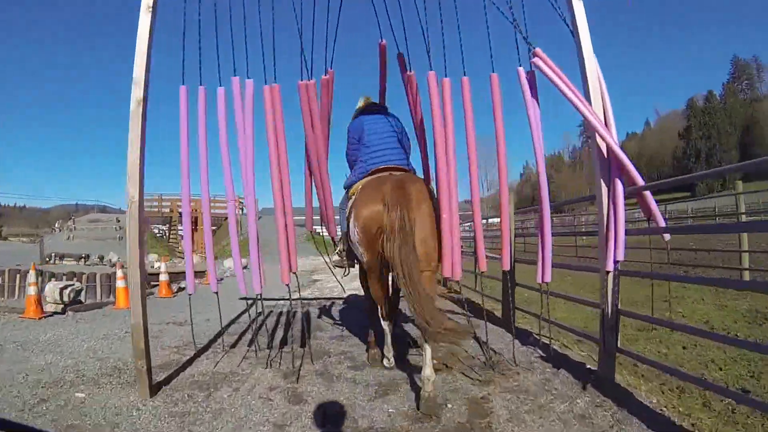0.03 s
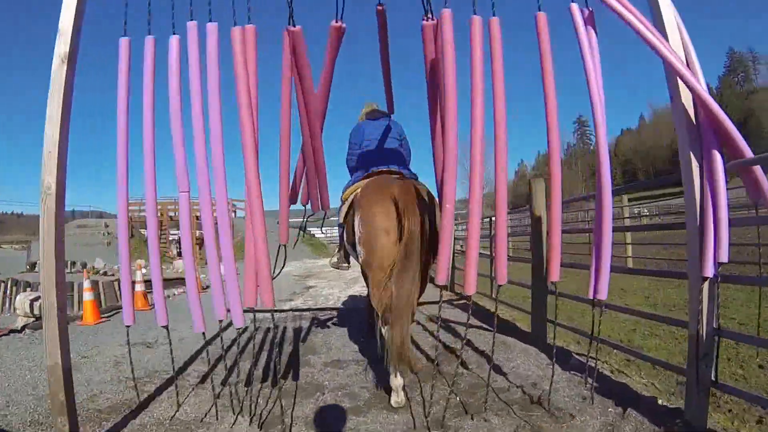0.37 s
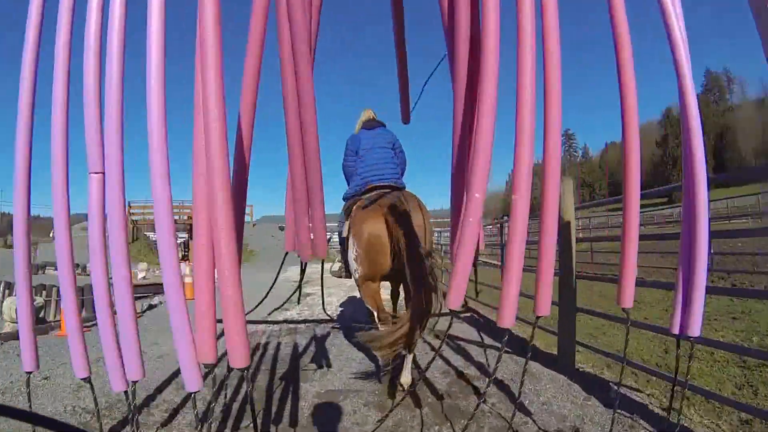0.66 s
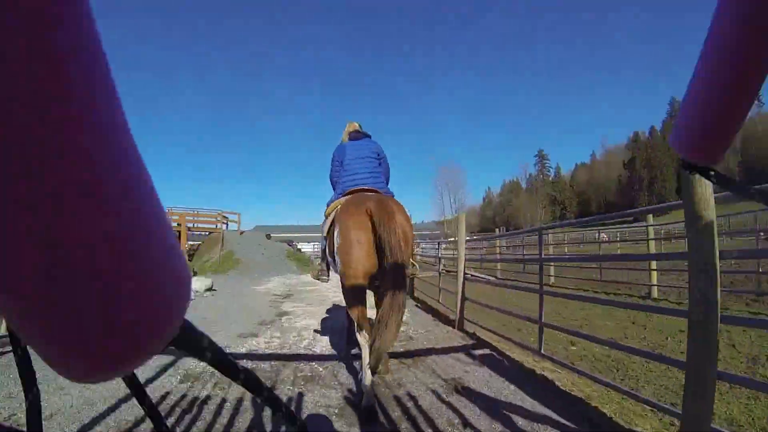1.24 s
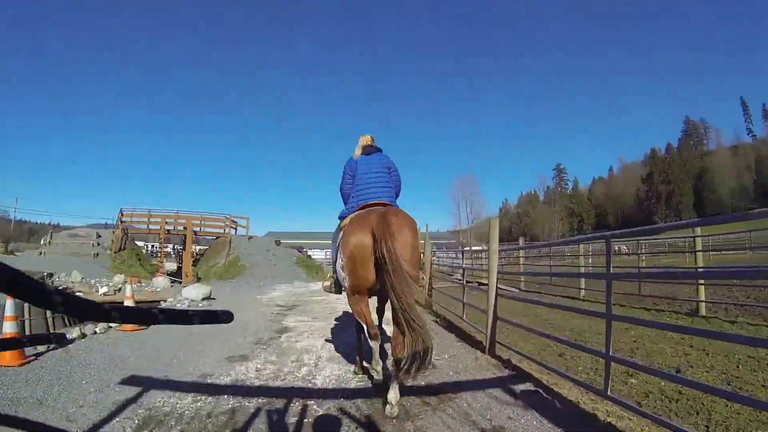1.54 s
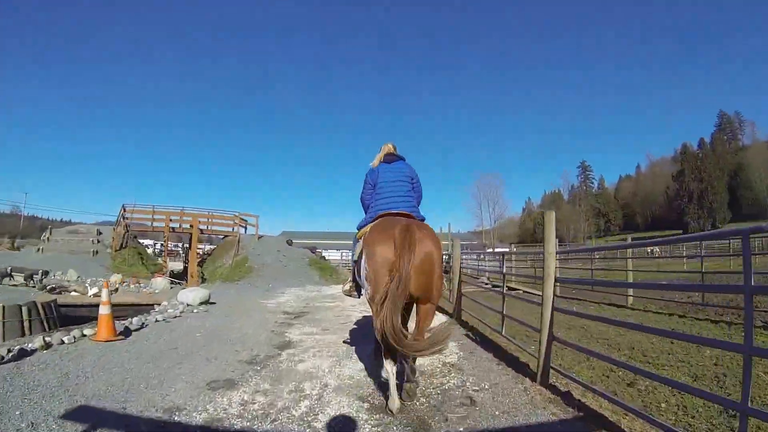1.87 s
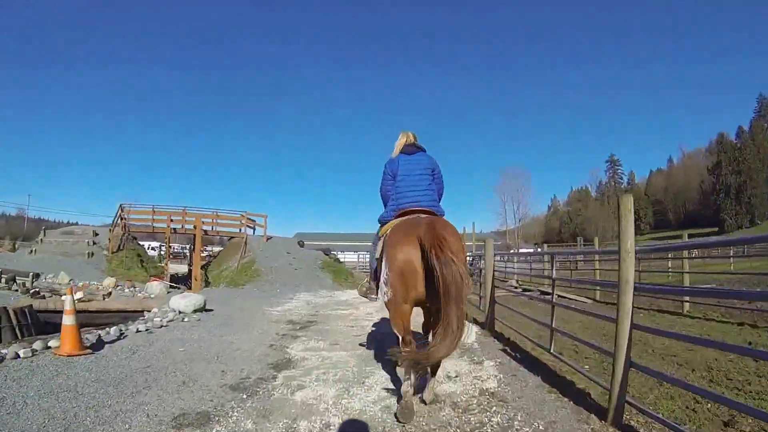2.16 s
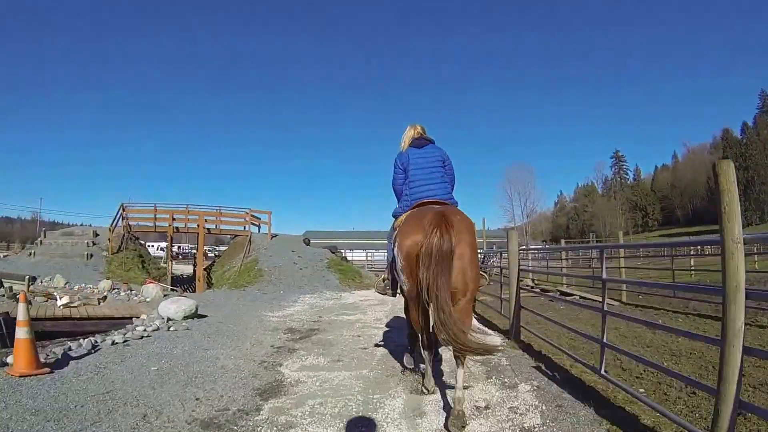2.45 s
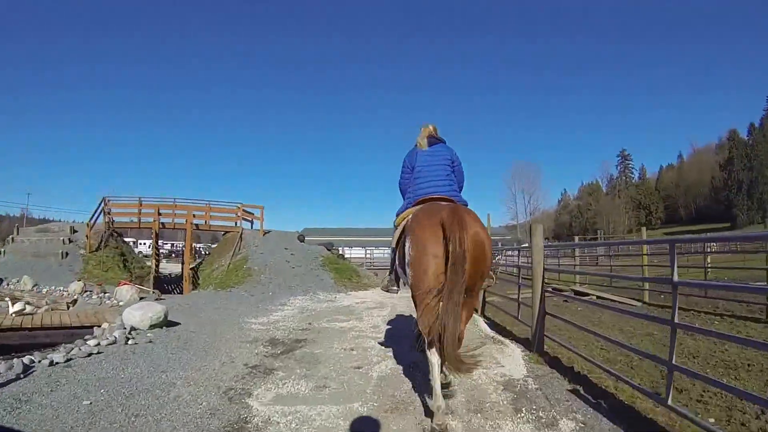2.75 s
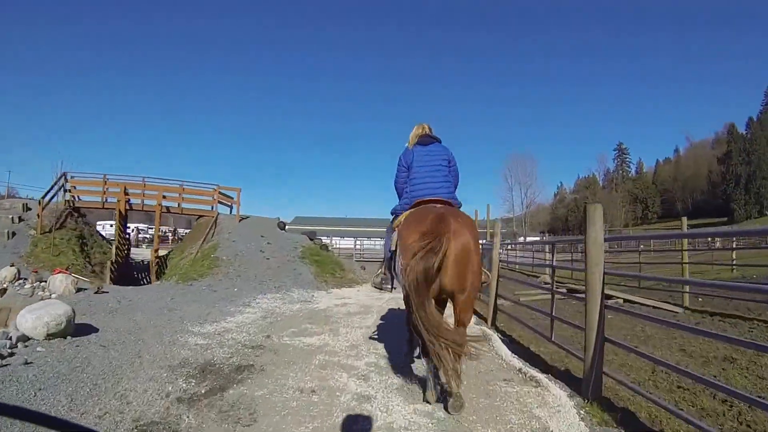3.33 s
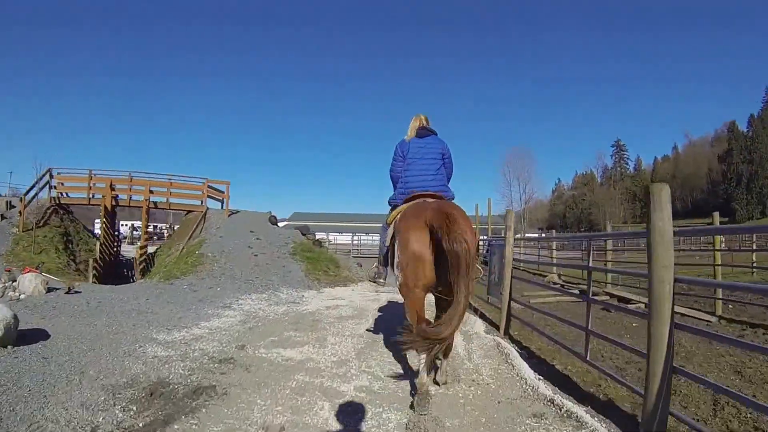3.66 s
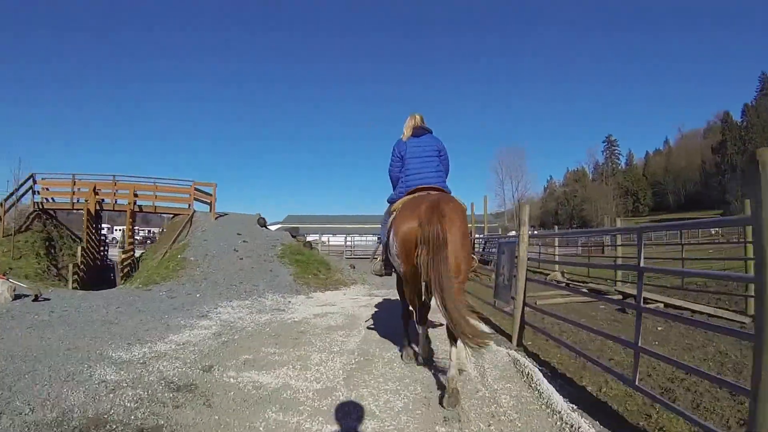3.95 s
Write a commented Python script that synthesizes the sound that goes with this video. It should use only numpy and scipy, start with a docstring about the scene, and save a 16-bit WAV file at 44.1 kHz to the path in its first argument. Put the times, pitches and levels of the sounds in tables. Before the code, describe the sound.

Low, jolting rumble of a camera riding over gravel behind a walking horse, with crunches and clacks.

```python
"""A cased camera's mount sways and drones as it rides over rough gravel just behind a walking horse.
Jolts thump through it with a gritty crackle; heavier bumps leave it ringing. Stones grind under the
carrier and steps crunch. Hard parts clack against the carrier and ring the case as it passes hanging
foam poles and ropes, then a bumpy stretch. Wind and road rumble below; faint squeaks and a whine above."""
import sys
import numpy as np
from scipy.fft import rfft, irfft, next_fast_len
from scipy.io import wavfile
from scipy.ndimage import uniform_filter1d, minimum_filter1d, map_coordinates

SR = 44100
rng = np.random.default_rng(int(sys.argv[2]) if len(sys.argv) > 2 else 0)


def put_to_file(sound):
    """Save the sound as 16-bit audio at rate SR, in the file named by the first command-line argument."""
    columns = np.atleast_2d(sound).T  # one column per channel
    safe = np.clip(columns, -1, 1)
    whole_steps = np.round(safe * 32767)
    wavfile.write(sys.argv[1], SR, whole_steps.astype(np.int16))


N = 176400

# mount jolts: time_s, level_db, pitch_hz, crackle_db
MOUNT_JOLTS = [(0.076, -4.5, 48.5, -49), (0.119, -9.5, 68.7, -49), (0.375, -9, 54.2, -53.5),
               (0.515, -13.5, 137, -61), (0.594, -4.5, 86, -69), (0.661, -10, 58, -51),
               (0.888, -3.5, 56.4, -49.5), (1.082, -4, 80.4, -49.5), (1.311, -5.5, 61.5, -49),
               (1.349, -33, 44.3, -57.5), (1.516, -10.5, 58.3, -54), (1.535, -9.5, 49.4, -49),
               (1.633, -5.5, 80.6, -49.5), (1.856, -9, 51, -50), (1.923, -11.5, 113.3, -50.5),
               (2.079, -9, 59, -53), (2.244, -11.5, 51.4, -65.5), (2.345, -12, 89.4, -63),
               (2.436, -12.5, 88, -50), (2.497, -12.5, 79.5, -66), (2.567, -10.5, 66, -65),
               (2.701, -17, 71.4, -86), (3.18, -12.5, 70.5, -65.5), (3.261, -6.5, 48.4, -47.5),
               (3.347, -17, 120.5, -52), (3.633, -12, 78, -85), (3.695, -6, 84, -56),
               (3.774, -7.5, 87, -54.5), (3.828, -7, 58.6, -50.5), (3.871, -6, 45.8, -52.5)]
# gravel spectrum: freq_hz, density_db
GRAVEL_SPECTRUM = [(120, -28), (320, 10.5), (400, -2), (480, -2.5), (555, 14.5), (620, -1), (690, -3.5),
                   (770, 1.5), (880, -7), (1150, 0.5), (1600, -2), (1950, -13), (2600, -20), (3650, -21.5),
                   (4150, -38), (7000, -52), (11000, -66), (15000, -65.5)]
# crackle spectrum: freq_hz, density_db
CRACKLE_SPECTRUM = [(500, 0.5), (2000, 15.5), (4000, 7), (6500, -0.5), (9000, -8), (11500, -10),
                    (13000, -19.5), (15000, -40.5)]
CRACKLE_GAIN_DB = 7.5


def amp(db):
    """Decibels to gain."""
    return 10 ** (np.asarray(db) / 20)


def unit(x):
    """Scale to rms 1."""
    return x / np.sqrt(np.mean(x ** 2) + 1e-20)


def unit_blow(x):
    """Scale to the energy of 5 ms at rms 1."""
    return x / np.sqrt(np.sum(x ** 2) / (.005 * SR))


def curve(rows):
    """Per-sample values from (time_s, value) rows."""
    return np.interp(np.arange(N) / SR, *np.transpose(rows))


def wobble(rate_hz):
    """Smooth random curve, rate_hz knots a second."""
    return map_coordinates(rng.standard_normal(4096), [np.arange(N) * rate_hz / SR], mode="wrap")


def arch(start_s, length_s):
    """Rounded envelope, peak 1."""
    progress = np.clip((np.arange(N) / SR - start_s) / length_s, 0, 1)
    return np.sqrt(np.abs(np.sin(np.pi * progress)))


def tone(hz):
    """Sine of per-sample pitch, rms 1."""
    return unit(np.sin(2 * np.pi * np.cumsum(hz) / SR))


def filtered(x, response):
    """Apply a frequency response."""
    size = next_fast_len(len(x) + SR // 10)
    return irfft(rfft(x, size) * response(np.fft.rfftfreq(size, 1 / SR)), size)[:len(x)]


def coloured(x, spectrum):
    """Filter by (freq_hz, density_db) rows on a log axis; rms 1."""
    freq_hz, density_db = np.transpose(spectrum)
    return unit(filtered(x, lambda hz: amp(np.interp(np.log(hz + 1), np.log(freq_hz + 1), density_db))))


def grit(spectrum, spiky=0.6, size=N):
    """Tiny contacts of log-normal strength, 32 samples each; coloured, rms 1."""
    log_strength = spiky * np.clip(rng.standard_normal(size // 32 + 1), -1.8, 1.8)
    strength = np.repeat(np.exp(log_strength), 32)[:size]
    return coloured(rng.standard_normal(size) * strength, spectrum)


def sway():
    """The mount shakes at its lowest, wandering frequency; hard jolts interrupt the swing."""
    # time_s, level_db
    levels = [(0.0, -1.5), (0.07, -17.5), (0.14, -10.5), (0.17, -33), (0.22, -14), (0.99, -14.5),
              (1.05, -31), (1.1, -20), (1.14, -24), (1.38, -12.5), (1.49, -26.5), (1.53, -12), (1.73, -17),
              (1.79, -30.5), (1.85, -7.5), (1.88, -12.5), (1.92, -31), (2.1, -12.5), (2.16, -10),
              (2.21, -24), (2.25, -7), (2.32, -25.5), (2.44, -9.5), (2.75, -16.5), (3.19, -11.5),
              (3.22, -28), (3.25, -13.5), (3.5, -17.5), (3.9, -11), (4.0, -12.5)]
    stall_s, full_stall_db = 0.013, 12.5
    t = np.arange(N) / SR
    swing = amp(curve(levels) + 0.5) * tone(hz=37.65 + 4.59 * wobble(15))
    for time_s, level_db, pitch_hz, _ in MOUNT_JOLTS:
        depth = min(amp(level_db - full_stall_db), 1)
        swing *= 1 - depth * np.exp(-((t - time_s - .25 / pitch_hz) / stall_s) ** 2)
    return swing


def rumble():
    """Wind and road: uneven low noise."""
    # freq_hz, density_db
    spectrum = [(10, 4), (24, 9.5), (45, 12.5), (65, 1.5), (110, -7), (180, -34.5), (260, -53.5),
                (400, -71.5)]
    return amp(-24) * grit(spectrum, spiky=0.7)


def fizz(shaking):
    """Tiny ticks and faint hiss, strongest at the turning points of the shaking."""
    # freq_hz, density_db
    hiss_spectrum = [(1000, 1.5), (5000, 8.5), (8000, -1.5), (11000, -10.5), (12500, -20), (15500, -29)]
    ticks_per_s = 890
    strain = np.minimum(unit(shaking) ** 2, 3)
    ticks = (rng.random(N) < ticks_per_s / SR) * (2 * rng.random(N) - 1)
    crackle = coloured(ticks * (.1 + strain), CRACKLE_SPECTRUM)
    hiss = (1 + 0.6 * strain) * grit(hiss_spectrum, spiky=0)
    return amp(-64) * crackle + amp(-87.5) * hiss


def drone():
    """Rough ground keeps the mount's resonances ringing."""
    # time_s, level_db
    levels = [(0.0, -29.5), (0.39, -33.5), (0.99, -28.5), (1.32, -33.5), (1.56, -34.5), (1.86, -33.5),
              (2.28, -30), (2.51, -28), (2.65, -23), (2.91, -32.5), (3.07, -26.5), (3.24, -29),
              (3.48, -30.5), (3.6, -29.5), (4.0, -32.5)]
    # mount resonances: centre_hz, width_hz, level_db
    modes = [(187, 23.6, 7.5), (148, 88.6, -4), (305, 57, -14.5), (87.5, 32.4, -9)]
    gain_db, flutter_db, lowpass_hz = 4, 6, 600

    def response(hz):
        body = 0
        for k, (centre_hz, width_hz, level_db) in enumerate(modes):
            damping = 1j * hz * width_hz
            body += (-1) ** k * amp(level_db) * damping / (centre_hz ** 2 - hz ** 2 + damping)
        return body / (1 + (hz / lowpass_hz) ** 4)

    ring = filtered(rng.standard_normal(N), response)
    running_rms = np.sqrt(np.abs(uniform_filter1d(ring ** 2, size=2000)) + 1e-12)
    return amp(curve(levels) + gain_db + flutter_db * np.tanh(wobble(25))) * ring / running_rms


def rolling():
    """Small stones grind under the carrier, brighter on loose ground."""
    # time_s, level_db, treble_db
    ground = [(0.0, -35.5, -4.5), (0.12, -41.5, -1), (0.3, -39, 2.5), (0.39, -45.5, -7), (0.42, -46, -9.5),
              (0.49, -40.5, -2.5), (0.54, -40.5, 2), (0.7, -46, 0), (0.8, -45, -2.5), (1.16, -42.5, 4),
              (1.3, -47, -10), (1.44, -53.5, 7), (1.58, -52.5, 0), (1.74, -48, 1.5), (1.96, -41, 0),
              (2.1, -43, -6), (2.19, -44, -3), (2.3, -41.5, 4.5), (2.46, -38, -4.5), (2.54, -38, 5),
              (2.63, -46.5, 6), (2.87, -43.5, -2), (3.06, -43.5, -3), (3.28, -35.5, -8.5),
              (3.45, -46, -4.5), (3.68, -38, -2.5), (3.82, -40.5, -10), (4.0, -47.5, -15)]
    gain_db, flutter_db, shelf_hz = 1.5, 3.5, 1870
    level_db, treble_db = (curve(np.array(ground)[:, [0, k]]) for k in (1, 2))
    stones = grit(GRAVEL_SPECTRUM, spiky=0.43)
    treble = filtered(stones, lambda hz: 1 - 1 / (1 + (hz / shelf_hz) ** 8))
    envelope = amp(level_db + gain_db + flutter_db * np.tanh(wobble(45)))
    return envelope * (stones + (amp(treble_db) - 1) * treble)


def whine():
    """Very quiet, wavering high tone."""
    # time_s, level_db
    levels = [(0, -77), (0.12, -84), (.35, -80.5), (0.45, -83), (.6, -83), (0.9, -86), (1.5, -89.5),
              (1.74, -91), (1.83, -78), (2.0, -90), (2.3, -92.5), (2.4, -78), (2.9, -89), (3.21, -80),
              (3.25, -105)]
    return amp(curve(levels) + wobble(8)) * tone(hz=10645 + 22 * wobble(120))


def booms():
    """Heavier bumps leave the mount ringing briefly."""
    # start_s, level_db, pitch_hz, t60_s
    bumps = [(0.018, -10.5, 185, 0.31), (0.107, -12, 207, 0.099), (0.343, -4, 175.5, 0.18),
             (0.504, -11.5, 179, 0.079), (0.846, -8.5, 179.5, 0.072), (1.041, -14, 218, 0.077),
             (1.076, -9.5, 161.4, 0.13), (1.464, -20.5, 188, 0.39), (1.192, -16, 193, 0.11),
             (1.81, -13, 188.7, 0.28), (1.907, 5, 141.3, 0.1), (1.913, -8, 236, 0.096),
             (1.942, -7.5, 182.1, 0.24), (2.351, -9, 183, 0.098), (2.41, -7.5, 176, 0.13),
             (2.493, -12, 200.3, 0.23), (2.623, -29, 195, 0.18), (2.735, -1, 170.5, 0.062),
             (3.104, -16, 205, 0.16), (3.336, 0, 167, 0.078), (3.369, -6.5, 197.4, 0.15),
             (3.492, -13, 138.8, 0.26), (3.653, -19, 182, 0.56), (3.8, -8, 184.7, 0.16)]
    rise_s = 0.0063
    out, t = np.zeros(N), np.arange(SR // 4) / SR
    rise = 1 - np.exp(-(t / rise_s) ** 2)
    for start_s, level_db, pitch_hz, t60_s in bumps:
        add(out, start_s, amp(level_db - 60 * t / t60_s) * rise * np.sin(2 * np.pi * pitch_hz * t))
    return out


def crunches():
    """Stones give way under load: quick rise, short grainy fall."""
    # start_s, level_db, fall_s, tilt_db_per_oct
    slips = [(0.023, -31.5, 0.024, 0.5), (0.074, -25, 0.019, -1.5), (0.269, -40.5, 0.012, 4.5),
             (0.328, -32, 0.029, -0.5), (0.362, -29.5, 0.022, -4.5), (0.581, -40, 0.0079, 4),
             (0.587, -17.5, 0.0062, -1), (.657, -22.5, 0.0091, 1.5), (0.795, -29.5, 0.016, -0.5),
             (0.86, -29, 0.029, -5), (1.066, -30.5, 0.042, 2), (1.118, -39, 0.0048, 4),
             (1.284, -25.5, 0.011, -5.5), (1.503, -33, 0.021, -2.5), (1.635, -29, 0.0034, 4),
             (1.807, -33, 0.076, -4.5), (1.901, -19.5, 0.019, -4.5), (1.916, -19.5, 0.012, 1),
             (1.977, -33.5, 0.0029, 3), (2.052, -26.5, 0.014, -9), (2.13, -30.5, 0.014, -8),
             (2.244, -29, 0.018, 0.5), (2.327, -29.5, 0.023, 2), (2.417, -24.5, 0.013, -5.5),
             (2.491, -29, 0.016, 6.5), (2.566, -29.5, 0.016, 4.5), (2.59, -32, 0.091, -2),
             (2.674, -34.5, 0.016, 5.5), (2.724, -29.5, 0.032, -0.5), (2.82, -29, 0.01, -2),
             (3.096, -31, 0.035, -2), (3.247, -32.5, 0.036, 1.5), (3.327, -28.5, 0.02, 0.5),
             (3.368, -22, 0.019, -3), (3.535, -36.5, 0.0087, -0.5), (3.679, -28, 0.014, -1.5),
             (3.804, -30.5, 0.011, 1)]
    rise_s = 0.0016
    out, t = np.zeros(N), np.arange(SR // 5) / SR
    for start_s, level_db, fall_s, tilt_db_per_oct in slips:
        stones = grit(GRAVEL_SPECTRUM, spiky=0.52, size=len(t))
        stones = filtered(stones, lambda hz: amp(tilt_db_per_oct * np.log2(hz.clip(400, 4000) / 1000)))
        envelope = (1 - np.exp(-t / rise_s)) / (1 + (t / fall_s) ** 4)
        envelope_rms = np.sqrt(np.mean(envelope ** 2))
        add(out, start_s, amp(level_db) * envelope_rms * unit(envelope * stones))
    return out


def squeaks():
    """Faint, thin tones with rough pitch."""
    # start_s, length_s, pitch_hz, level_db
    events = [(0.028, 0.0059, 3650, -39.5), (0.823, 0.076, 3650, -56), (3.502, 0.011, 3750, -58.5),
              (3.531, 0.012, 3650, -60)]
    out = np.zeros(N)
    for start_s, length_s, pitch_hz, level_db in events:
        out += amp(level_db) * arch(start_s, length_s) * tone(pitch_hz + 47 * wobble(500))
    return out


def fine_grit():
    """Short, dense clusters of tiny bright contacts."""
    # start_s, length_s, level_db
    clusters = [(0.05, 0.048, -59), (0.215, 0.03, -59), (0.265, 0.013, -55.5), (0.361, 0.039, -53.5),
                (0.518, 0.025, -57.5), (0.594, 0.0051, -40.5), (0.813, 0.0093, -55), (1.517, 0.041, -64),
                (1.904, 0.042, -54), (2.123, 0.03, -58.5), (2.23, 0.036, -62), (2.437, 0.027, -56),
                (2.506, 0.037, -62.5), (2.562, 0.014, -60.5), (3.094, 0.012, -62), (3.854, 0.023, -65.5),
                (3.91, 0.0051, -55)]
    envelope = np.zeros(N)
    for start_s, length_s, level_db in clusters:
        envelope += amp(level_db + CRACKLE_GAIN_DB) * arch(start_s, length_s)
    flicker = amp(14 * np.tanh(wobble(220)))
    return envelope * unit(flicker * grit(CRACKLE_SPECTRUM))


def jolts():
    """Each jolt pushes the mount, which swings back; both turning points crackle."""
    lead_s, crackle_s, rise_cycles, decay_cycles = .015, 0.0019, 0.2, 0.32
    thumps, crackle_envelope = np.zeros(N), np.zeros(N)
    t = np.arange(SR // 10) / SR - lead_s
    for time_s, level_db, pitch_hz, crackle_db in MOUNT_JOLTS:
        cycles = t * pitch_hz
        rise = np.exp(-(cycles / rise_cycles) ** 2)
        fall = np.exp(-cycles / decay_cycles * np.tanh(2 * cycles))
        swing = np.where(t < 0, rise, fall) * np.cos(2 * np.pi * cycles)
        add(thumps, time_s - lead_s, -amp(level_db) * swing)
        push = np.exp(-(t / crackle_s) ** 2)
        rebound = 0.98 * np.exp(-((t - .5 / pitch_hz) / crackle_s) ** 2)
        add(crackle_envelope, time_s - lead_s, amp(crackle_db + CRACKLE_GAIN_DB) * (push + rebound))
    return thumps + crackle_envelope * grit(CRACKLE_SPECTRUM)


def case_ring(t, pitch_hz):
    """Three chattering contacts excite the damped case modes, favouring those near pitch_hz."""
    # case modes: mode_hz, level_db, t60_s
    modes = [(1030, -1, 0.02), (1200, 5.5, 0.014), (1532, -0.5, 0.023), (1789, 3.5, 0.015),
             (2100, -10.5, 0.0046), (2218, -1, 0.019), (2506, -14, 0.0047), (2680, -17, 0.0045),
             (2930, 2, 0.02), (3400, -13.5, 0.012), (3610, -1.5, 0.02), (4240, -4, 0.021),
             (5250, -13, 0.012), (6040, -15, 0.016)]
    chatter_s, bounce_db, focus_db_per_oct, detune = 0.001334, -12, 10, 0.035
    mode_hz, level_db, t60_s = np.transpose(modes)[:, :, None]
    focus_db = -focus_db_per_oct * np.abs(np.log2(mode_hz / pitch_hz))
    signs = (-1) ** np.arange(len(modes))[:, None]
    ring = np.zeros(len(t))
    for bounce in range(3):
        level_jitter, pitch_jitter, time_jitter = rng.standard_normal((3, len(modes), 1))
        delay_s = chatter_s * bounce * (0.701 + 0.74 * rng.random()) + .0004 * np.abs(time_jitter)
        age_s = np.maximum(t - delay_s, 0)
        strike_db = level_db + focus_db + bounce_db * bounce + 2 * level_jitter
        partials = signs * np.sin(2 * np.pi * mode_hz * (1 + detune * pitch_jitter) * age_s)
        ring += np.sum(amp(strike_db - 60 * age_s / t60_s) * partials, axis=0)
    return ring


def clacks():
    """Hard parts hit and chatter: case ring, hollow knock, crack and dense rattle."""
    # start_s, level_db, pitch_hz, knock_db, crack_db, rise_s
    hits = [(1.0652, -13.5, 1800, -7, -33, 0.00088), (1.094, -21.5, 2000, -1, -23, 0.00052),
            (1.1549, -23.5, 1700, -1.5, -27.5, 0.0015), (1.1869, -23, 1355, -6, -16.5, 0.00052),
            (1.2406, -34.5, 1560, 1, -29, 0.0026), (1.937, -29.5, 1510, 11, -26, 0.00072),
            (2.053, -34.5, 1950, 9.5, -15, 0.00045), (2.252, -17, 1820, -2, -13, 0.0012),
            (2.2873, -35.5, 2080, -14, -17.5, 0.00062), (2.332, -14.5, 2120, -5, -10.5, 0.002),
            (2.499, -23, 1730, 6.5, -17, 0.00036), (2.5977, -14.5, 1540, -6, -23.5, 0.00099),
            (2.63, -24.5, 1680, -3, -18, 0.0016), (2.6975, -17.5, 2080, -0.5, 1, 0.0018),
            (2.724, -12.5, 1520, -7, -11.5, 0.0019), (2.839, -20, 2850, 2, 3.5, 0.0015),
            (2.9861, -42, 1900, -21, 5, 0.0017), (3.2117, -35.5, 1590, -1, -17, 0.00062)]
    # freq_hz, density_db
    crack_spectrum = [(300, 6.5), (850, -0.5), (1500, 17), (3100, -5), (4000, -44), (4350, -15),
                      (4700, -8.5), (5300, -8), (5850, -21.5), (6400, -10.5), (7500, -26.5), (9000, -27),
                      (12000, -24), (15000, -51.5)]
    gain_db, ring_db, rattle_db = -3, -1.5, -4
    knock_t60_s, crack_t60_s, rattle_t60_s, rattle_width_oct = 0.012, 0.02, 0.018, 0.55
    out, t = np.zeros(N), np.arange(SR // 10) / SR
    for start_s, level_db, pitch_hz, knock_db, crack_db, rise_s in hits:
        def rattle_band(hz):
            octaves = np.log2((hz + 1) / pitch_hz)
            return np.exp(-(octaves / rattle_width_oct) ** 2) / (1 + (hz / 3500) ** 12)

        ring = case_ring(t, pitch_hz)
        knock_hz = 468 * (1 + 0.15 * rng.standard_normal())
        knock = amp(-60 * t / knock_t60_s) * np.sin(2 * np.pi * knock_hz * t)
        crack = amp(-60 * t / crack_t60_s) * grit(crack_spectrum, size=len(t))
        rattle = amp(-60 * t / rattle_t60_s) * filtered(rng.standard_normal(len(t)), rattle_band)
        rise = 1 - np.exp(-(t / rise_s) ** 2)
        parts = [(ring_db, ring), (rattle_db, rattle), (knock_db, knock), (crack_db, crack)]
        clack = sum(amp(part_db) * unit_blow(rise * part) for part_db, part in parts)
        add(out, start_s, amp(level_db + gain_db) * clack)
    return out


def add(out, start_s, sound):
    """Mix a sound in at start_s."""
    i = max(round(start_s * SR), 0)
    out[i:i + len(sound)] += sound[:max(len(out) - i, 0)]


def scene():
    """One microphone inside the case; outdoors, no echo."""
    shaking = sway() + rumble()
    ride = shaking + fizz(shaking) + drone() + rolling()
    impacts = jolts() + booms() + crunches() + fine_grit() + clacks()
    return (ride + impacts + whine() + squeaks())[None]


def record(dry):
    """Camera: bass cut, peak limiter, band limit."""
    highpass_hz, ceiling, top_hz = 10, .86, 15800
    x = filtered(dry[0], lambda hz: hz ** 2 / (hz ** 2 + highpass_hz ** 2))
    needed_gain = np.minimum(1, ceiling / (np.abs(x) + 1e-9))
    held_gain = minimum_filter1d(needed_gain, size=401)
    smooth_gain = uniform_filter1d(uniform_filter1d(held_gain, size=201), size=201)
    return filtered(x * smooth_gain, lambda hz: hz < top_hz)[None]


dry = scene()
out = record(dry)
put_to_file(out)
```